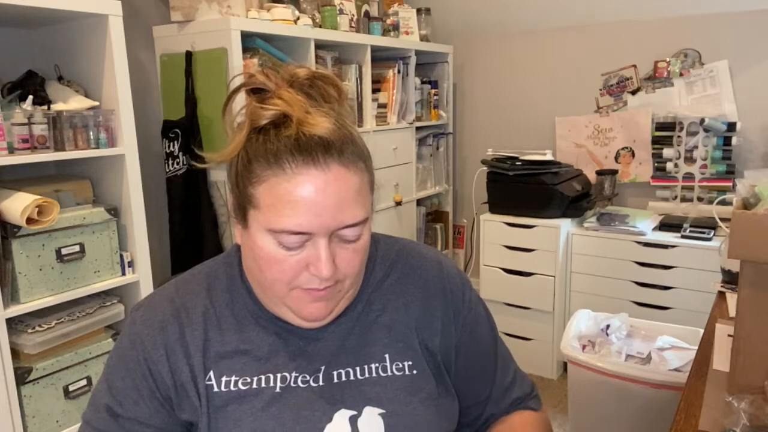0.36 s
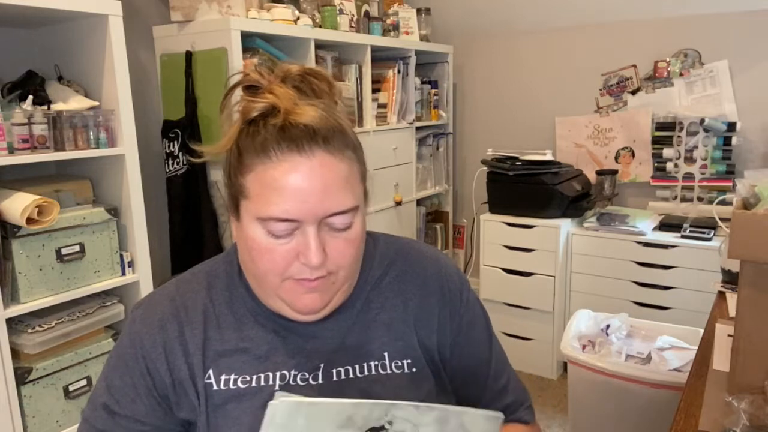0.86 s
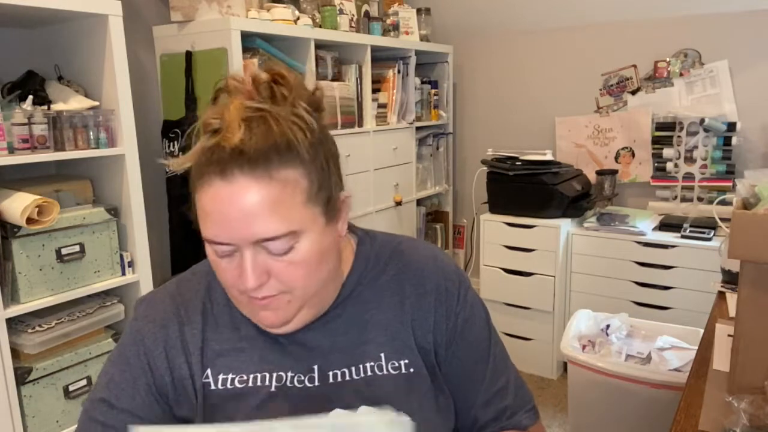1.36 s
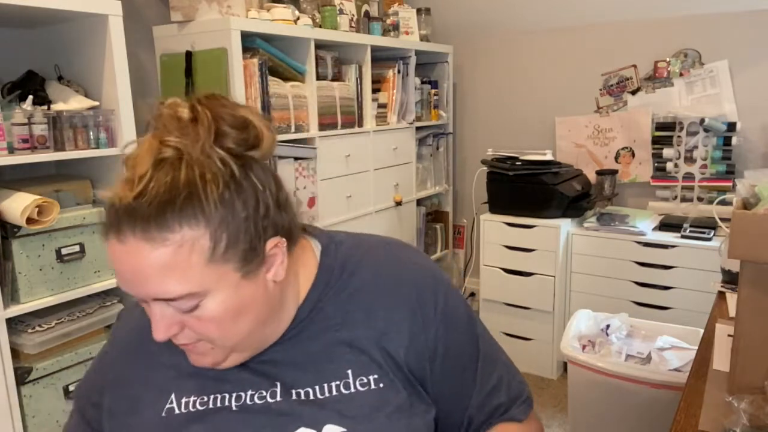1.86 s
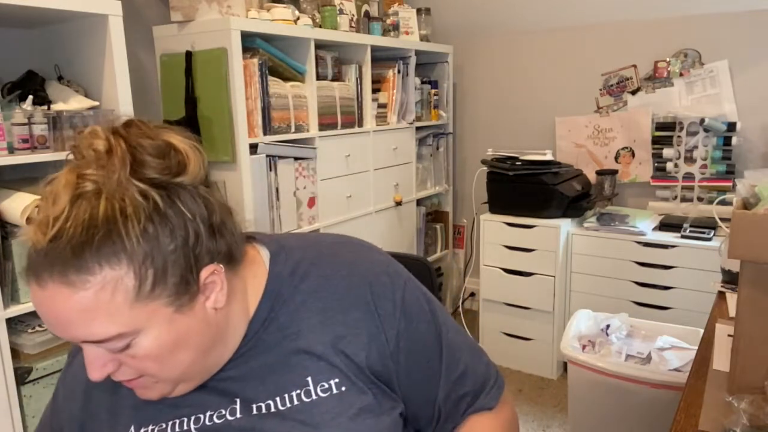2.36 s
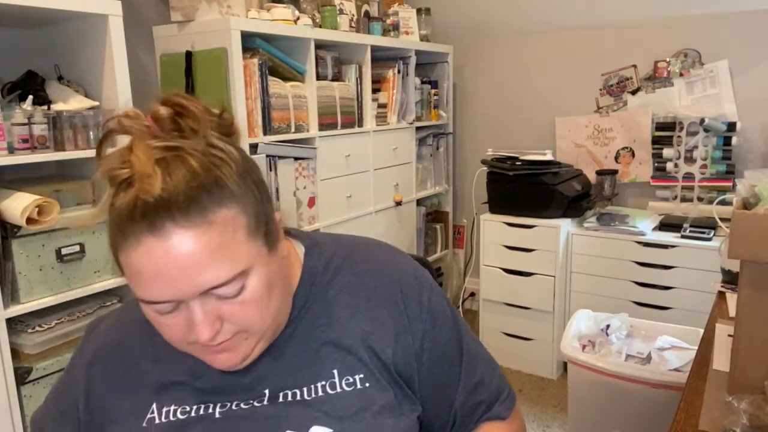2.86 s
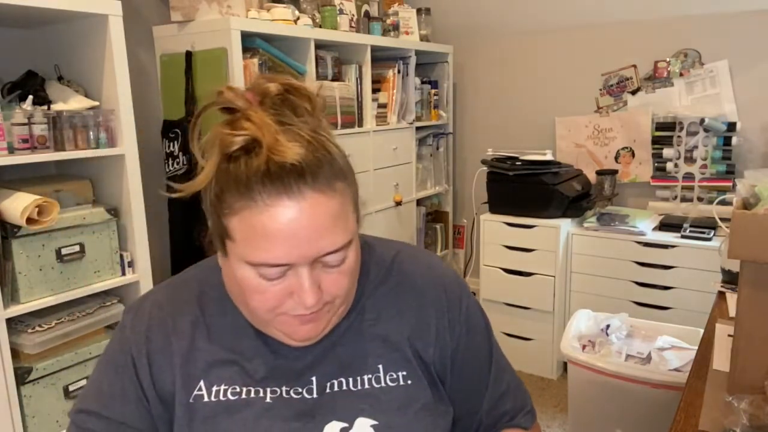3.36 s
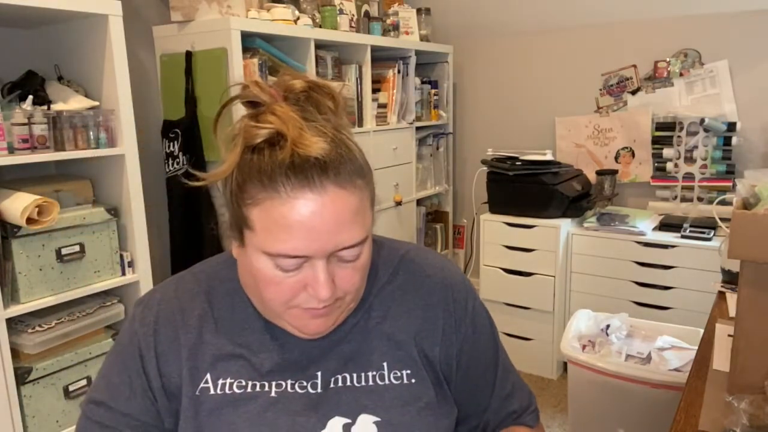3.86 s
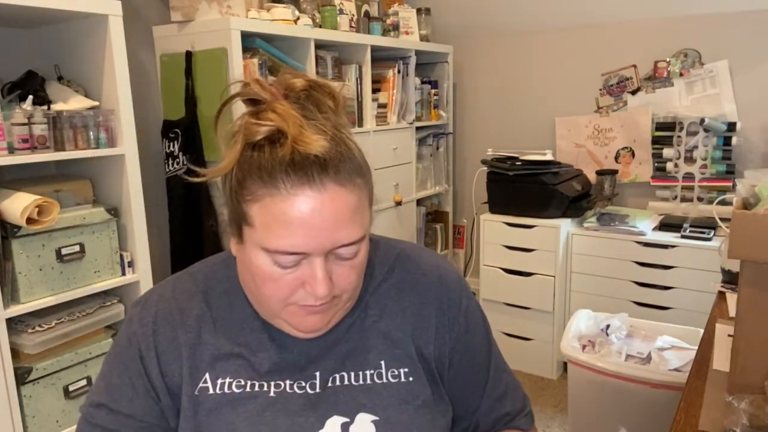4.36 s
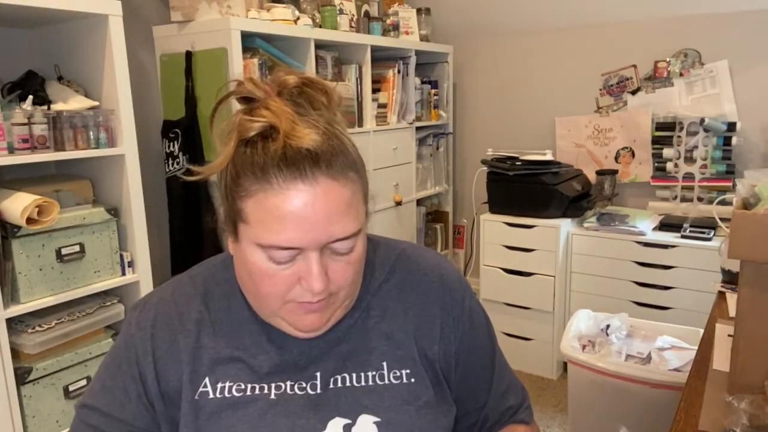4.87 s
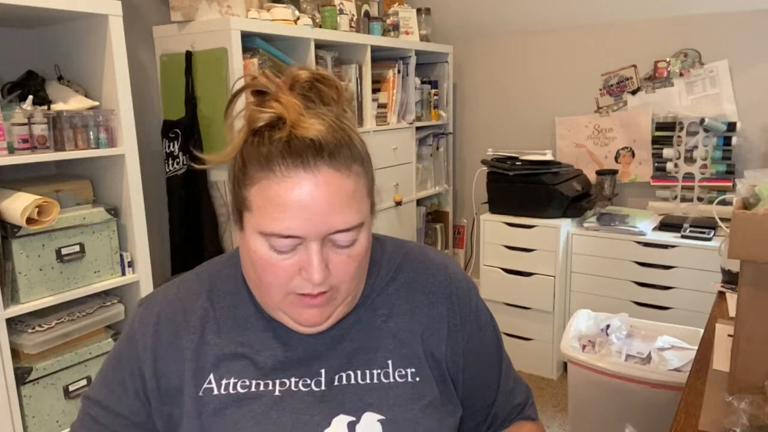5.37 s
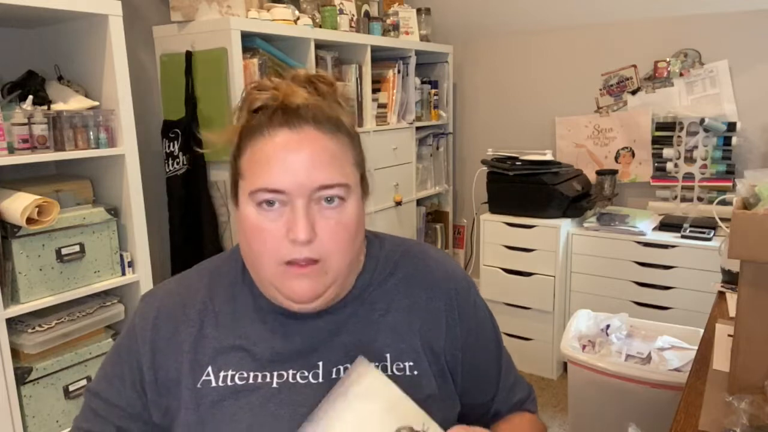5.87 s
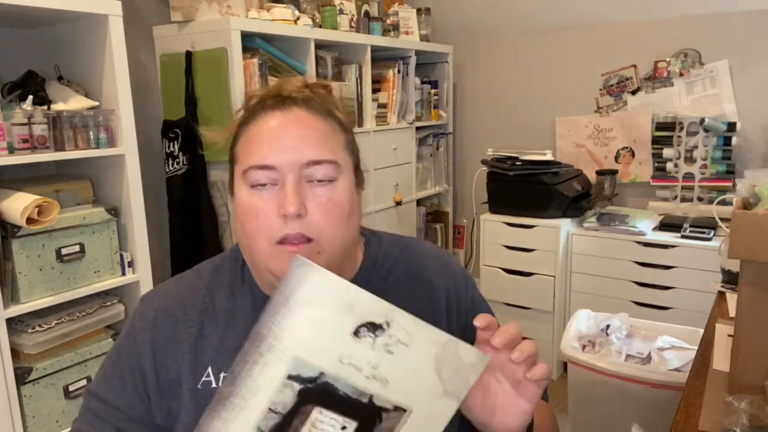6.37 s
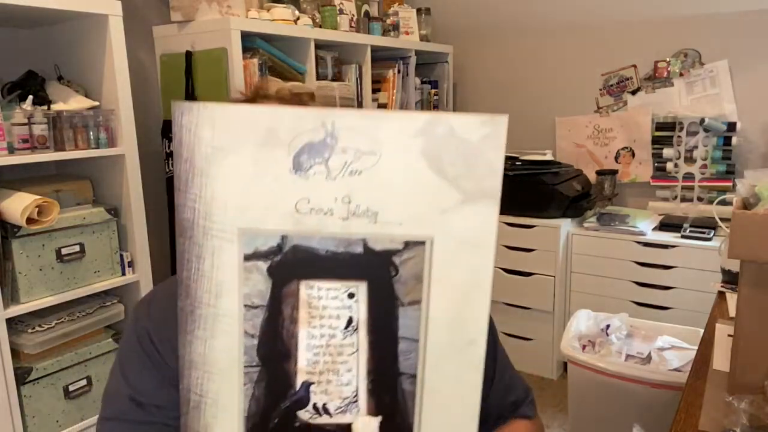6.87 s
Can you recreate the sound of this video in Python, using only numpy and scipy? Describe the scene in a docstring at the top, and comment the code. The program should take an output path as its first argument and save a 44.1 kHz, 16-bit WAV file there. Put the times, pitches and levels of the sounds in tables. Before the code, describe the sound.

Stiff paper leaflets are shuffled, slid and lifted close by in a quiet room, with dull buckling pops, crisp snaps and soft hiss.

```python
"""At a desk in a small quiet room, stiff paper leaflets are shuffled, slid and lifted close by, in stereo.
Buckling sheets excite decaying modes of sheet and desk, heard as dull pops with crisp snaps of noise.
Dense random slips give a grainy hiss when filtered into bands, and a low flutter when they shake the modes.
Dragged edges whistle breathily, with one brief high tick; a mains hum (a sine) and a low rumble
(filtered noise) waver underneath."""
import sys
import numpy as np
from scipy import signal
from scipy.fft import rfft, irfft, next_fast_len
from scipy.io import wavfile

SR = 44100
rng = np.random.default_rng(int(sys.argv[2]) if len(sys.argv) > 2 else 0)


def inscribe(sig):
    """Save sig as 16-bit PCM at rate SR to the path in sys.argv[1].

    A 1-D sig is mono; a 2-D sig holds one channel per row.
    Samples are clipped to [-1, 1] before scaling.
    """
    pcm = np.round(np.clip(np.atleast_2d(sig).T, -1, 1) * 32767)
    wavfile.write(sys.argv[1], SR, pcm.astype(np.int16))


N = 319576   # samples

# Levels in the tables are nominal: the sources add offsets, and the two sides differ by 1.2 dB.
# The wavering background. Each row: time in seconds, rumble level in dB, hum level in dB.
BACKGROUND_LEVELS = [(0.0, -58.5, -61), (1.01, -53.5, -59.5), (5.75, -55.5, -59.5), (6.05, -60, -62.5),
                     (6.86, -60.5, -65.5), (7.25, -56.5, -57.5)]
# Spectrum of the rumble. Each row: frequency in Hz, relative level in dB.
RUMBLE_SPECTRUM = [(30, -32.5), (60, 8.5), (75, 6), (100, -19), (150, -22), (350, -18), (1000, -56.5),
                   (16000, -43)]
HUM_HZ = 118.3
ROOM_T60_S, WALL_CUT_HZ, ROOM_DB = 0.16, 4700, -7.5

# Breathy whistles of a dragged edge, and one brief high tick at 4.51 s. Each row: start in seconds,
# end in seconds, start pitch in Hz, end pitch in Hz, level in dB.
WHISTLES_AND_TICK = [(0.121, 0.203, 755, 735, -62), (0.242, 0.318, 1158, 1402, -50),
                     (0.336, 0.57, 1390, 1408, -59), (0.52, 0.602, 2184, 2330, -57),
                     (2.306, 2.44, 1605, 1740, -67), (3.32, 4.064, 4720, 4215, -65.5),
                     (4.512, 4.535, 4730, 4700, -50), (4.2, 4.765, 3326, 3530, -60),
                     (4.128, 4.503, 4550, 4320, -58.5), (4.804, 4.961, 4050, 3640, -60.5),
                     (5.76, 5.912, 4320, 3900, -64), (5.972, 6.166, 5200, 5480, -66.5)]

# A hand sweeps a sheet, swelling and fading. Each row: peak time in seconds, length in seconds,
# slide level in dB, bend level in dB.
SWEEPS = [(0.0, 0.3, -67, -65), (0.264, 0.44, -55.5, -47.5), (0.562, 0.26, -55, -59.5),
          (0.828, 0.24, -55.5, -86), (0.952, 0.3, -55.5, -53), (1.47, 0.21, -66, -53),
          (1.569, 0.25, -66, -61), (1.825, 0.29, -77.5, -78), (2.075, 0.36, -77, -58.5),
          (2.226, 0.31, -74.5, -68), (2.707, 1, -71, -90), (2.877, 0.39, -68.5, -51),
          (3.096, 1, -65.5, -71), (3.5, 0.53, -64, -56.5), (3.677, 0.28, -60, -40), (3.985, 1, -67, -57),
          (4.486, 1, -61.5, -57), (4.742, 0.3, -68.5, -48.5), (4.921, 0.44, -60, -52.5),
          (5.132, 0.42, -54, -43.5), (5.406, 0.22, -91.5, -77), (5.515, 0.41, -62.5, -47.5),
          (5.755, 0.99, -65, -72), (5.877, 0.13, -60.5, -49), (6.098, 0.35, -69, -82),
          (6.184, 0.062, -59, -50), (6.238, 0.088, -62, -51.5), (6.687, 0.17, -65.5, -59.5),
          (7.028, 0.31, -79, -58.5), (7.105, 0.16, -67, -48.5)]
RISE_SHARE = 0.39   # of the length
ENDS_DB = 21.5   # drop at both ends
BEND_LINGERS = 1.47   # bending outlasts sliding by this factor
ROUNDNESS = 1.173   # 1 = pointed top of a sweep, 2 = rounded
REST_SLIDE_DB, REST_BEND_DB = -89.5, -74.5   # the hands at rest
# A sheet is jerked free, drags on, then settles. Each row: start in seconds, drag in seconds,
# slide level in dB, bend level in dB.
JERKS = [(1.048, 0.22, -50.5, -46.5), (1.311, 0.02, -49.5, -31), (2.422, 0.013, -44.5, -32),
         (3.146, 0.12, -59.5, -45), (3.272, 0.054, -68, -41), (4.095, 0.23, -59, -54),
         (4.978, 0.011, -61, -49), (5.596, 0.17, -63.5, -49.5), (5.972, 0.045, -66.5, -63.5)]
JERK_S, SETTLE_DB_PER_S = 0.0069, 200.5

# Spectrum of the sliding hiss. Each row: frequency in Hz, relative level in dB.
HISS_SPECTRUM = [(1300, -16), (2200, -1), (4300, 2.5), (6500, -3), (9000, 3), (12000, -12.5),
                 (14000, -19.5), (16000, -10)]
BRIGHT_HZ, BRIGHTENS = 6300, 0.096   # a faster slide gains treble: extra dB per dB of hiss
SCUFF_SLIDE_SHARE, SCUFF_DB = 0.51, -6   # the edge scuffs when a sheet both slides and bends

# Modes of the sheet and, lowest, the thump of the desk under it. Each row: frequency in Hz,
# relative level in dB, 60 dB decay time in seconds (halved while the sheet flexes).
MODES = [(96, -2.5, 0.26), (146.4, -3.5, 0.14), (226, -6, 0.084), (324, -5.5, 0.059), (401.5, -1, 0.067),
         (457, -2, 0.05), (626, 1.5, 0.036), (741, 3, 0.015), (999, -2.5, 0.048), (1183, 2, 0.016),
         (1437, -2, 0.03), (1760, 3, 0.011), (2620, -1.5, 0.0061)]
# A sheet buckles. Each row: time in seconds, peak level in dB, pitch of the buckled patch in Hz,
# snap level in dB against the pop.
POPS = [(0.203, -38, 700, -30), (0.246, -40.5, 620, -5), (0.289, -44, 670, -21.5),
        (1.061, -31.5, 516, -1.5), (1.1, -37.5, 442, -12), (1.153, -22.5, 320, -14), (1.162, -20, 638, -32),
        (1.169, -26.5, 310, -35), (1.202, -31.5, 207, -8.5), (1.207, -31.5, 1600, -13),
        (1.21, -25.5, 590, -28), (1.32, -30.5, 302, -10), (1.331, -30, 710, -13.5),
        (1.367, -35.5, 390, -37), (2.243, -48, 376, -35), (2.425, -31, 1470, -9), (2.454, -34, 490, -9),
        (2.484, -44.5, 318, -28), (2.641, -39.5, 422, -33), (2.816, -52, 800, -17), (2.834, -49, 400, -35),
        (2.865, -48.5, 900, -8), (2.931, -44, 870, -17), (2.966, -48.5, 884, -9), (3.164, -41.5, 603, -1.5),
        (3.277, -26.5, 426, -11.5), (3.328, -36.5, 500, -22), (3.651, -40.5, 240, -12),
        (3.755, -42, 340, -43), (4.099, -47.5, 644, -30), (4.316, -38, 480, -20), (4.52, -39.5, 755, -11),
        (4.552, -45, 720, -12), (4.572, -49, 600, -6), (4.682, -34, 463, -9.5), (4.682, -42, 2240, -7),
        (4.712, -46.5, 556, -23), (4.741, -41.5, 580, -26), (4.768, -44.5, 1360, -8),
        (4.982, -29.5, 575, -30), (4.997, -33, 231, -21), (5.049, -41.5, 490, -9), (5.125, -30.5, 660, -24),
        (5.255, -38, 410, -3.5), (5.299, -47, 510, -1), (5.376, -47.5, 408, -41), (5.453, -46, 660, -8),
        (5.492, -53.5, 810, -3), (5.538, -40, 597, -14.5), (5.598, -29.5, 490, -37),
        (5.639, -22.5, 2000, -20.5), (5.642, -27, 597, -17), (5.664, -26.5, 440, -23.5),
        (5.687, -30.5, 686, -11), (5.752, -30.5, 488, -29), (5.986, -52.5, 886, -20),
        (7.126, -41.5, 362, -31), (7.176, -52.5, 1210, -8)]
PATCH_DB, PATCH_CYCLES = -8, 1.33   # the buckled patch itself: level against the pop, cycles to its peak

# Stereo image. Each row: frequency in Hz, left-right likeness, phase in radians by which the left lags;
# the treble alternates between opposed and equal sides.
STEREO_IMAGE = [(60, .93, .3), (200, .92, .3), (600, .62, .8), (2000, .55, .8), (5000, .35, 1.2),
                (7600, .7, 1.9), (8700, .985, 3.0), (9650, .985, 3.25), (11100, .97, 6.1),
                (12500, .97, 6.4), (14000, .98, 9.3), (15000, .98, 9.5), (16000, .9, 10.3)]


def from_db(db):
    """Decibel law: level in dB to amplitude gain."""
    return 10 ** (np.asarray(db) / 20)


def rms_one(x):
    """Normalisation to unit root-mean-square value."""
    return x / np.sqrt(np.mean(x ** 2) + 1e-20)


def in_time(rows):
    """Linear interpolation of the columns of a time table, one value a sample."""
    s, *columns = np.transpose(rows)
    return [np.interp(np.arange(N) / SR, s, c) for c in columns]


def at_hz(points, hz):
    """Interpolation of a spectrum on a logarithmic frequency axis."""
    table = np.array(points)
    return np.interp(np.log(hz), np.log(table[:, 0] + 1), table[:, 1])


def drift(rate_hz):
    """Slow random modulation of spread 1: noise through a two-pole lowpass at one value per 40 samples."""
    r = np.exp(-80 * np.pi * rate_hz / SR)
    noise = rng.standard_normal(N // 40 + 2002)
    slow = signal.lfilter([1], [1, -2 * r, r * r], noise)[2000:]   # without the onset
    return np.interp(np.arange(N) / 40, np.arange(len(slow)), rms_one(slow))


def ring(clicks, hz, t60):
    """Impulse response of a damped resonator: a unit click starts a decaying sine of height near 1."""
    r, w = from_db(-60 / (t60 * SR)), 2 * np.pi * hz / SR
    return signal.lfilter([0, np.sin(w)], [1, -2 * r * np.cos(w), r * r], clicks + 1e-18)


def grains(per_s, spread_db, clump_db, clump_hz):
    """Stick-slip as a random point process: two trains of clumped tiny slips of random size and sign."""
    sizes = from_db(spread_db * np.minimum(rng.exponential(1, (2, N)), 5))
    sizes = sizes * rng.choice([-1, 1], (2, N))
    chance = per_s * from_db(clump_db * drift(clump_hz)) / SR
    return sizes * (rng.random((2, N)) < chance)


def coloured(sources, spectrum, patchy_db):
    """Subtractive synthesis in half-octave bands, each with its own level and flicker."""
    out = 0
    edges = 25 * 2 ** np.arange(0, 9.6, .5)
    for k, (low, high) in enumerate(zip(edges, edges[1:])):
        hz = np.sqrt(low * high)
        if hz > spectrum[0][0]:
            bandpass = signal.butter(2, [low, high], "band", fs=SR, output="sos")
            band = signal.sosfilt(bandpass, sources[k % 2])   # neighbours take unrelated sources
            out = out + from_db(at_hz(spectrum, hz) + patchy_db * drift(9.4)) * band
    return rms_one(out)


def background():
    """Broadband noise and a tone: filtered rumble, and a mains hum of wavering pitch and level."""
    rumble_db, hum_db = in_time(BACKGROUND_LEVELS)
    rumble = coloured(rng.standard_normal((2, 2, N)), RUMBLE_SPECTRUM, patchy_db=2.5)
    turns = np.cumsum(HUM_HZ + 0.67 * drift(13.3)) / SR
    hum = np.sqrt(2) * np.sin(2 * np.pi * turns) * from_db(hum_db + 0.21 * drift(14.0))
    return from_db(rumble_db) * rumble + hum * [[1], [0]]   # hum in the first part of the field only


def room(x):
    """Reverberation by recirculation: six feedback delays a side, duller on every round."""
    out = np.zeros((2, N))
    dull = np.exp(-2 * np.pi * WALL_CUT_HZ / SR)
    lags = (rng.uniform(.012, 0.03, 12) * SR).astype(int)
    for k, lag in enumerate(lags):
        loop, state = x.copy(), [0.]
        gain = from_db(-60 * lag / SR / ROOM_T60_S)
        for i in range(lag, N, lag):   # one round of the delay at a time
            back, state = signal.lfilter([gain * (1 - dull)], [1, -dull], loop[i - lag:i], zi=state)
            loop[i:i + lag] += back[:N - i]
        out[k % 2] += (loop - x) * (-1) ** (k // 2)
    return out


def whistles_and_tick():
    """Amplitude modulation of a gliding sine by lowpassed noise: a narrow band, drawn out or a brief tick."""
    t, out = np.arange(N) / SR, 0
    for start, end, from_hz, to_hz, db in WHISTLES_AND_TICK:
        catch = np.clip((t - start) / 0.0048, 0, 1)
        fade = np.clip((end - t) / (end - start), 0, 1) ** 0.1
        glide_hz = np.interp(t, [start, end], [from_hz, to_hz])
        turns = np.cumsum(glide_hz * (1 + .015 * drift(3.9))) / SR
        r = np.exp(-np.pi * .18 * from_hz / SR)   # bandwidth in step with pitch
        breath = rms_one(signal.lfilter([1], [1, -2 * r, r * r], rng.standard_normal((2, N))))
        level = from_db(db + 1.2 * drift(20.))
        out = out + level * catch * fade * breath * np.sin(2 * np.pi * turns)
    return out


def hands():
    """Addition of powers: sweeps, jerks and rest sum to a slide level and a bend level in dB."""
    t = np.arange(0, N / SR + .002, .001)
    peak, length, *sweep_db = np.transpose(SWEEPS)[..., None]
    start, drag, *jerk_db = np.transpose(JERKS)[..., None]
    away = np.maximum((peak - t) / RISE_SHARE, (t - peak) / (1 - RISE_SHARE)) / length
    before_db = (start + JERK_S - t) * ENDS_DB / JERK_S
    after_db = SETTLE_DB_PER_S * np.maximum(t - start - drag, 0)
    jerk_drop_db = np.maximum(before_db, after_db)
    levels = []
    for k, (rest_db, linger) in enumerate([(REST_SLIDE_DB, 1), (REST_BEND_DB, BEND_LINGERS)]):
        sweeps_db = sweep_db[k] - ENDS_DB * (away / linger) ** ROUNDNESS
        moves_db = np.vstack([sweeps_db, jerk_db[k] - jerk_drop_db])
        power = np.sum(from_db(2 * moves_db), axis=0) + from_db(2 * rest_db)
        levels.append(10 * np.log10(power))
    return in_time(np.transpose([t, *levels]))


def slide(hiss_db):
    """Stick-slip friction: fibres catch and slip densely, and a faster slide is brighter."""
    slips = []
    for _ in range(2):
        catches = rms_one(grains(6000, 3.8, 3.9, 32.0))
        slips.append(catches + 0.6 * rng.standard_normal((2, N)))
    hiss = coloured(slips, HISS_SPECTRUM, patchy_db=0.97)
    treble = signal.sosfilt(signal.butter(2, BRIGHT_HZ, "high", fs=SR, output="sos"), hiss)
    brighter = from_db(BRIGHTENS * (hiss_db - hiss_db.mean())) - 1
    return from_db(hiss_db + 2.0) * (hiss + brighter * treble)


def flex(flutter_db, scuff_db):
    """Random excitation of modes: small slips and buckles make low modes flutter and upper modes scuff."""
    low, high = 0, 0
    lurch = from_db(2.2 * drift(18.))   # the whole sheet lurches at once
    for hz, level_db, t60 in MODES:
        slips = lurch * grains(500, 2.37, 2.0, 21.0)
        shaken = rms_one(ring(slips, hz, .5 * t60))
        if hz < 850:
            low = low + from_db(level_db) * shaken
        else:
            high = high + from_db(level_db) * shaken
    return from_db(flutter_db - 6.5) * rms_one(low) + from_db(scuff_db) * rms_one(high)


def pop_modes():
    """Dispersion of bending waves: modes near the patch pitch ring, low ones later, so the pop falls."""
    s, peak_db, pitch, _ = np.transpose(POPS)
    chance = rng.normal(0, 1, (len(s), len(MODES), 4))
    out = np.zeros((2, N))
    for k, (hz, level_db, t60) in enumerate(MODES):
        octaves = np.log2(hz / pitch)
        near_db = np.where(octaves > 0, -11.0 * octaves, 7.0 * octaves)
        at = np.clip((s + 0.093 / np.sqrt(hz) - .003) * SR, 0, N - 1).astype(int)
        click_db = peak_db + level_db + near_db - 9.0 + 2.0 * chance[:, k, :2].T
        clicks = np.zeros((2, N))
        clicks[:, at] = from_db(click_db) * np.sign(chance[:, k, 2:].T)
        push = ring(clicks, hz, 1.86 / hz) * 16 * hz / SR   # the buckle takes a cycle to go through
        out += ring(push, hz, t60)
    return out


def pop_patches():
    """Transient oscillation: the buckled patch itself swells and dies away within a few cycles."""
    s, peak_db, pitch, _ = np.transpose(POPS)
    out = np.zeros((2, N))
    for start, db, hz in zip((s * SR).astype(int), peak_db + PATCH_DB, pitch):
        cycles = np.arange(int(12 * SR / hz)) * hz / SR
        swell = cycles / PATCH_CYCLES * np.exp(1 - cycles / PATCH_CYCLES)
        gains = from_db([[db], [db - 0.5]])
        out[:, start:start + len(cycles)] += gains * swell * np.sin(2 * np.pi * cycles)
    return out


def snaps():
    """Impulsive noise: the crease cracks, a burst of bandpassed grains under an exponential decay."""
    s, peak_db, _, snap_db = np.transpose(POPS)
    edge = np.zeros(N)
    edge[(s * SR).astype(int)] = from_db(peak_db + snap_db)
    crack = signal.lfilter([1], [1, -from_db(-60 / (.025 * SR))], edge)   # 60 dB in 25 ms
    bandpass = signal.butter(1, [1500, 3800], "band", fs=SR, output="sos")
    noise = signal.sosfilt(bandpass, grains(9000, 3.2, 6.0, 81.0))
    return from_db(0.5) * crack * rms_one(noise)


def pops():
    """Superposition: each buckle sounds as ringing modes, the patch itself and a snap."""
    return pop_modes() + pop_patches() + snaps()


def scene():
    """Superposition of background, paper and room tail, as two parts of the sound field."""
    buckles = pops()
    slide_db, bend_db = hands()
    scuff_db = SCUFF_SLIDE_SHARE * slide_db + (1 - SCUFF_SLIDE_SHARE) * bend_db + SCUFF_DB
    rubbing = slide(slide_db) + whistles_and_tick() + flex(bend_db, scuff_db)
    tail = from_db(ROOM_DB) * room(buckles[0])
    return background() + tail + rubbing + buckles


def roll_off(x):
    """The treble ends steeply here."""
    return signal.sosfilt(signal.butter(12, 16000, fs=SR, output="sos"), x)


def record(dry):
    """Interchannel coherence: the right side shares part of the left one's sound, shifted in phase."""
    size = next_fast_len(N + SR // 10)
    hz = np.arange(size // 2 + 1) * SR / size
    at, likeness, lag = np.transpose(STEREO_IMAGE)
    alike = np.clip(np.interp(hz, at, likeness), 0, .995)
    left, other = rfft(dry, size)
    shared = alike * left * np.exp(1j * np.interp(hz, at, lag))
    right = shared + np.sqrt(1 - alike ** 2) * other
    pair = irfft(np.array([left, right]), size)[:, :N]
    mix = pair * from_db([[.6], [-.6]])   # left 0.6 dB up, right 0.6 dB down
    return roll_off(mix)


dry = scene()
out = record(dry)
inscribe(out)
```